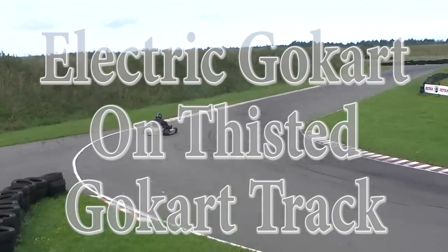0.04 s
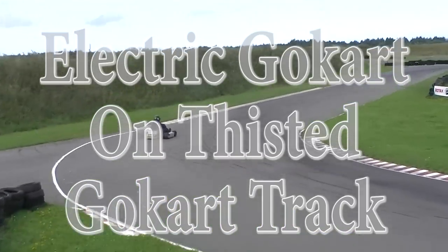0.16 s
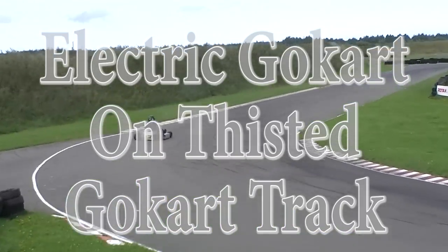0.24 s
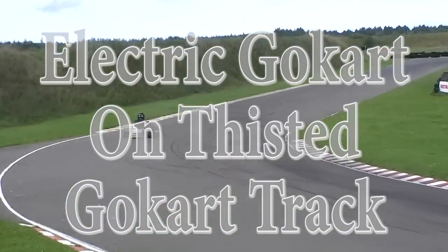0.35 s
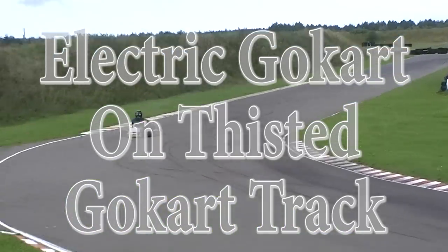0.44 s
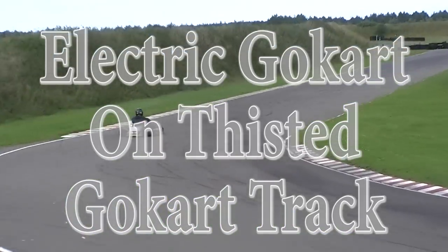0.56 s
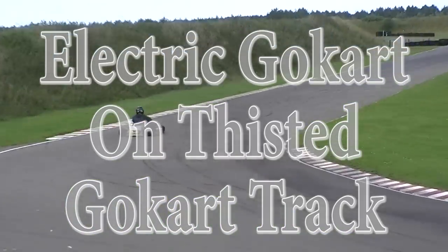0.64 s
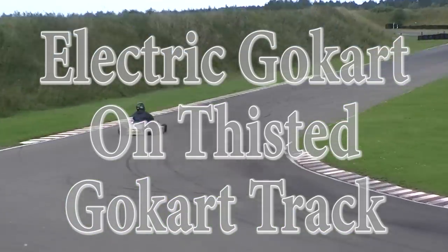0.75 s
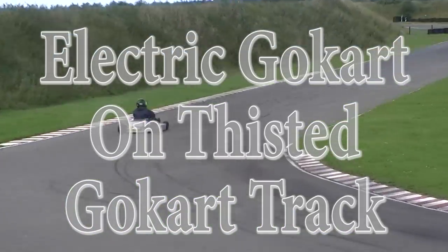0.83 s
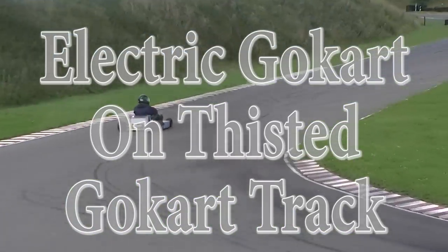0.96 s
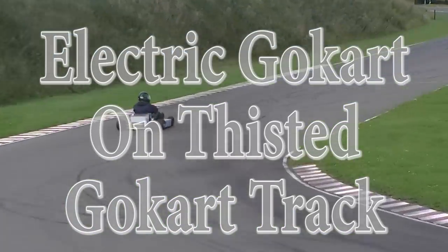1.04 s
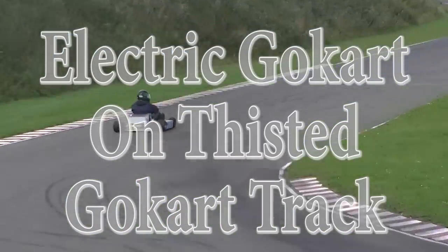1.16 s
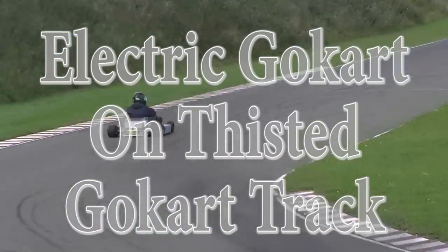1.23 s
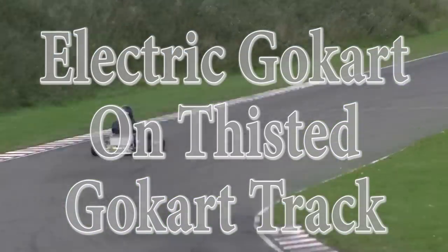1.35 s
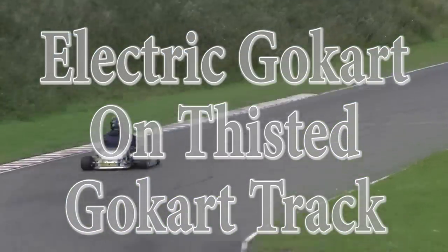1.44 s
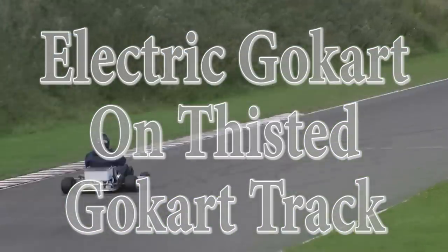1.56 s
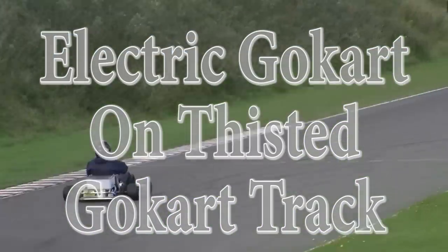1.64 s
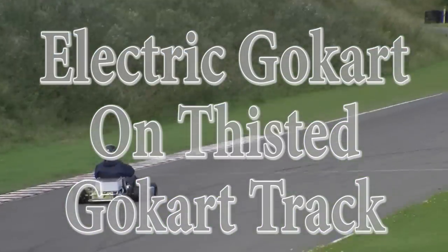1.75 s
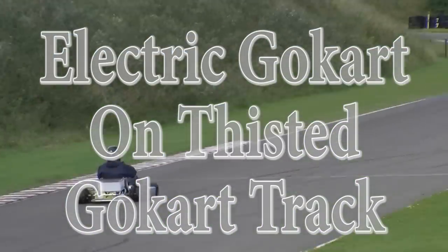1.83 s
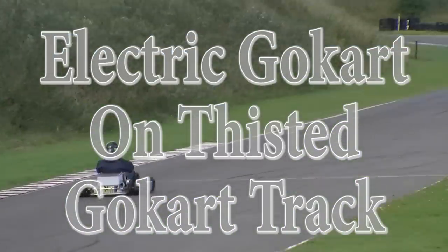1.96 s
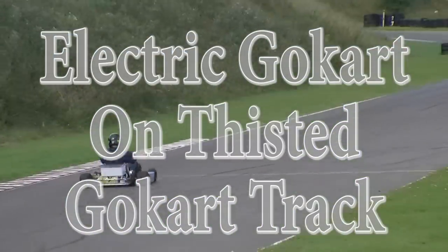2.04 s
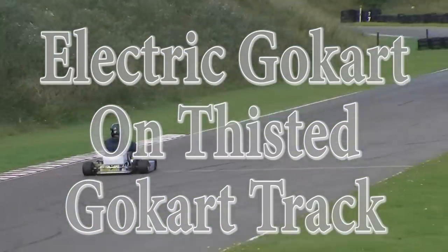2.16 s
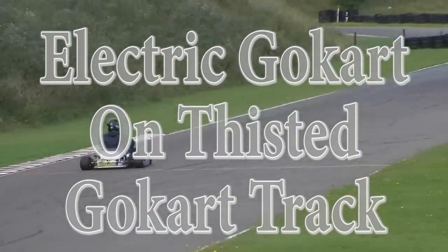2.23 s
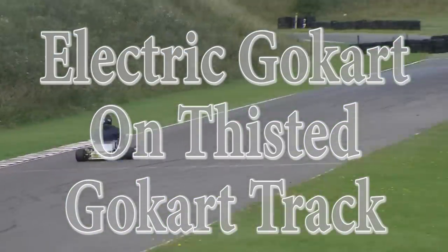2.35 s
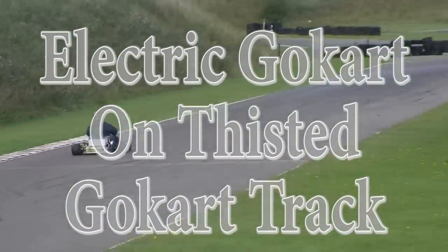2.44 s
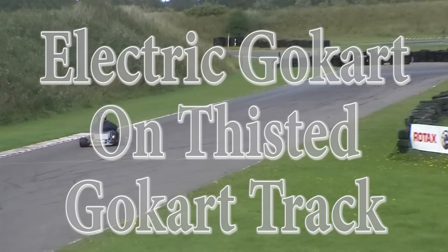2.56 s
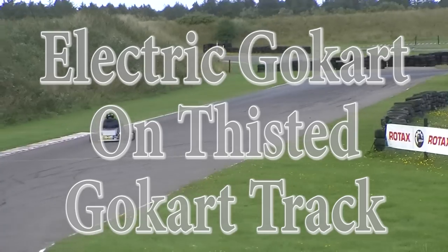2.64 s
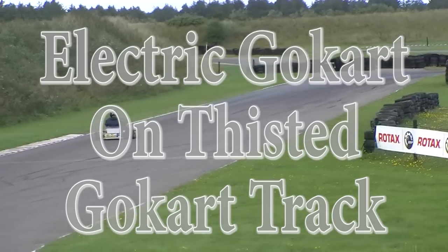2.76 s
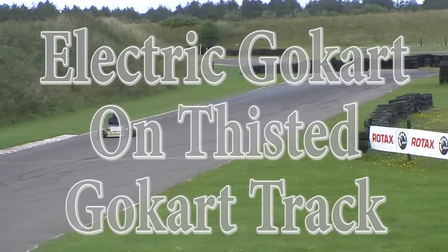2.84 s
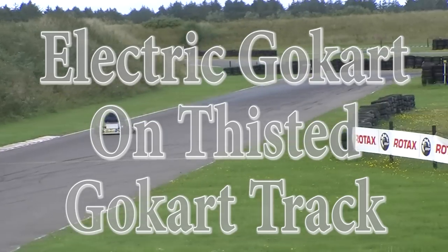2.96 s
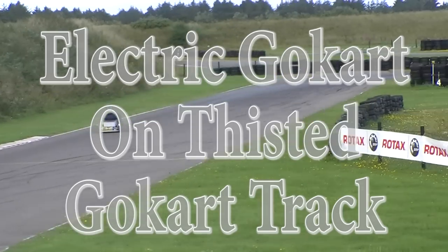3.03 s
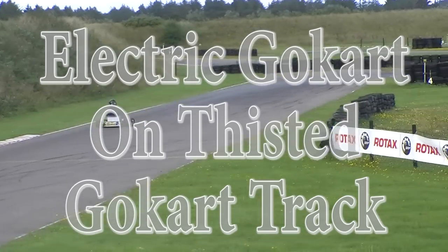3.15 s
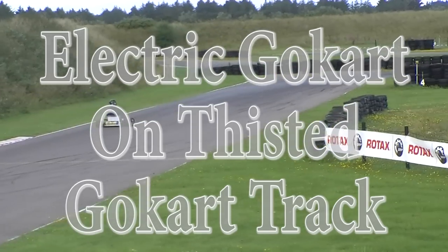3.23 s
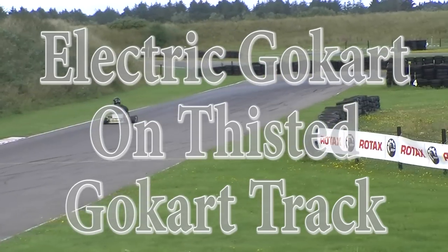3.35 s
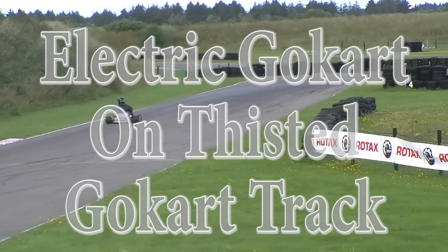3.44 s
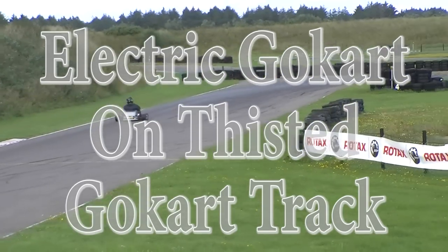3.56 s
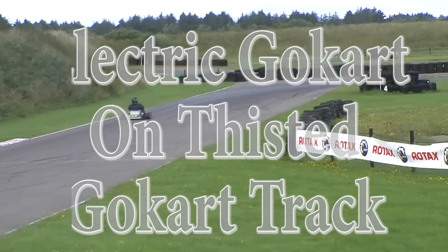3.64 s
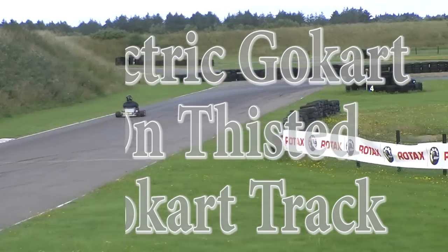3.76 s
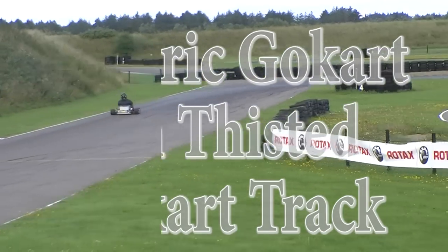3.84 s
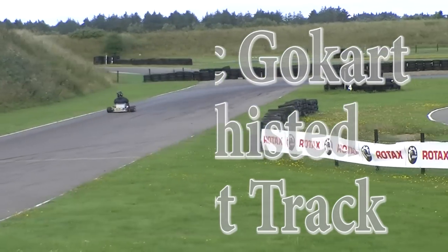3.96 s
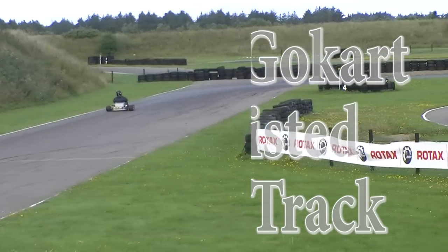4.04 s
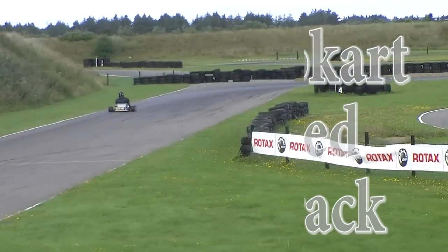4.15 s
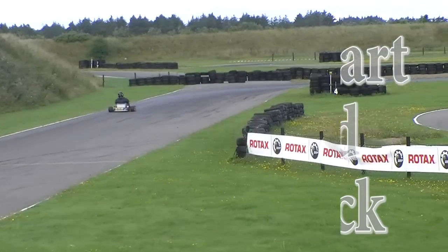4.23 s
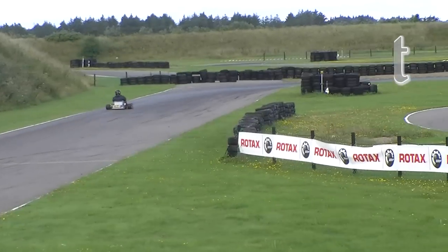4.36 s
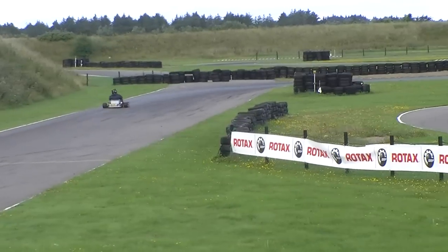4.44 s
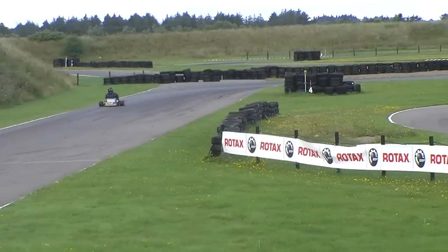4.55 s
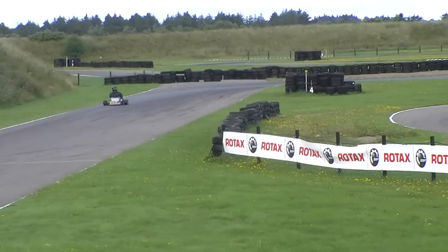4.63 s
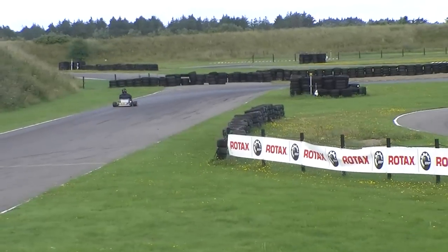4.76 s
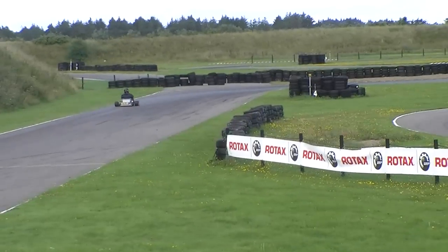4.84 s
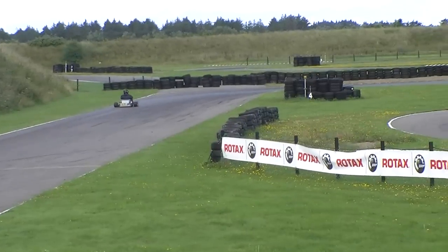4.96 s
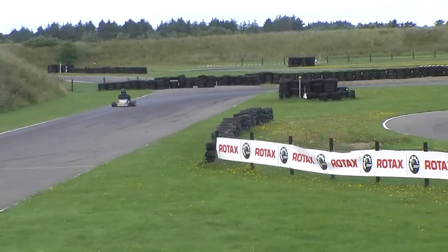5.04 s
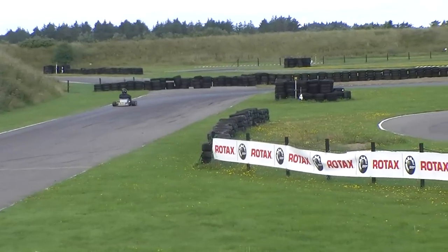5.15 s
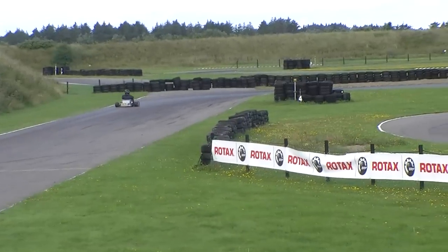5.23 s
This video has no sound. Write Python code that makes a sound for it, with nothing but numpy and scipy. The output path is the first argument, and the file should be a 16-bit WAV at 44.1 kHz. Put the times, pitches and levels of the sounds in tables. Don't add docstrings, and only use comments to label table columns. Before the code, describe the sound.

Trackside in open air, from the grass, with a small stereo microphone. From 0 s an electric go-kart is already strong: a bright, dense, sizzling hiss of chain rollers, and a clear whine around 435 Hz that climbs without steps, reaching about 800 Hz by 2 s and just over 1 kHz by 3.7 s. The whine flutters and swells or dips as the frame resonates. A metallic guard rattle and mid-pitched tyre roar fill in; the chain surges in short bursts near 1.9, 2.6 and 3.4 s. Tyre roar is fullest around 2.5 s, while the hiss briefly dulls near 2.75 s. Light wind thumps the microphone, strongest about 1 and 1.4 s. Small stones click at 1.56 and, loudest, 3.6 s. At 3.7 s the whine cuts off and the hiss drops; rattle and scrubbing tyre noise recede, with faint pings at 4.1 s, another wind bump at 5.1 s and faint leaves until 5.3 s.

```python
import sys
import numpy as np
from scipy import signal
from scipy.fft import rfft, irfft, next_fast_len
from scipy.io import wavfile
from scipy.ndimage import uniform_filter1d

SR = 44100
rng = np.random.default_rng(int(sys.argv[2]) if len(sys.argv) > 2 else 0)


def invert_db(level):
    return 10 ** (np.asarray(level, dtype=float) / 20)


def log_audio(samples):
    frames = np.atleast_2d(samples).T
    limited = np.clip(frames, -1, 1)
    pcm = np.round(limited * 32767).astype(np.int16)
    wavfile.write(sys.argv[1], SR, pcm)


N = 233476
T = np.arange(N) / SR

# frequency in Hz, density in dB per Hz.
RUSTLE_SPECTRUM = [(120, -16.5), (300, -2.5), (700, -6), (1500, -14.5), (3000, -19.5), (6000, -23),
                   (9400, -19), (11000, -27), (13500, -38), (15000, -50)]
# frequency in Hz, density in dB per Hz.
WIND_SPECTRUM = [(10, -45.5), (30, -14), (60, 3.5), (120, -0.5), (200, -3.5), (300, -17), (500, -25),
                 (900, -49.5), (2500, -110)]
# centre in seconds, peak in dB, half length in seconds.
GUSTS = [(.07, -63, .04), (0.273, -49, 0.059), (.46, -56, .07), (0.617, -44, 0.032), (0.76, -50.5, 0.073),
         (0.97, -35.5, .06), (1.12, -42, 0.074), (1.256, -45.5, 0.041), (1.438, -31, 0.059),
         (1.553, -46, 0.074), (1.738, -40.5, 0.031), (1.917, -52, 0.057), (2.13, -62, .07),
         (2.307, -65, .04), (2.52, -58, .11), (3.01, -52, 0.025), (3.15, -59, 0.036), (3.39, -45, 0.074),
         (3.555, -53.5, 0.056), (3.78, -51, .04), (3.944, -56, 0.051), (4.62, -58.5, .04),
         (4.912, -50, 0.029), (5.12, -37, .07)]
# start in seconds, peak in dB, pitch in Hz, 60 dB decay time in seconds.
GRIT = [
    (1.56, -24, 1500, .006),
    (3.556, -27, 620, .03),
    (3.613, -13, 1400, .008),
    (4.115, -36, 580, .09),
    (4.132, -36, 680, .06),
    (5.273, -33, 1400, .015),
]

# time in seconds, level in dB.
ROAR_LEVEL = [(0, -35), (.1, -34.5), (1.2, -37.5), (1.8, -33.5), (2.3, -32.5), (2.55, -29.5), (2.95, -37),
              (3.27, -33), (3.7, -40.5), (4.0, -39.5), (4.4, -44.5), (4.85, -50), (5.29, -53.5)]
# frequency in Hz, density in dB per Hz.
ROAR_SPECTRUM = [(350, -90), (650, -53), (800, -21.5), (950, -3), (1070, -2.5), (1240, 4.5), (1450, -1.5),
                 (1620, 2), (1800, 0.5), (2000, -2.5), (2150, -7), (2400, -21), (3000, -36), (5000, -110)]
# frequency in Hz, density in dB per Hz.
SCRUB_SPECTRUM = [(1000, -94), (1800, -21), (2250, -5.5), (2450, 0.5), (2680, 3), (2900, -1.5),
                  (3200, -6.5), (3500, -6.5), (4200, -25), (7000, -110)]
# frequency in Hz, density in dB per Hz.
DRONE_SPECTRUM = [(40, -80), (100, -68), (150, -51), (230, -4), (300, -19.5), (400, -15.5), (470, -2.5),
                  (600, 3.5), (740, -3.5), (850, -1.5), (1100, -35), (2000, -110)]
# centre in seconds, scrub change in dB, half length in seconds.
SLIDES = [(.43, 7.5, 0.069), (1.25, 4.5, 0.16), (1.84, 3.5, 0.24), (2.72, 6, 0.18), (3.05, 5, .05),
          (3.6, 4, 0.44), (3.9, 4, 0.046), (4.35, 9, 0.22), (4.78, 5.5, 0.2), (4.95, -7.5, 0.12),
          (5.22, 7, 0.18)]

# time in seconds, level in dB.
TICK_LEVEL = [(0, -32.5), (.25, -30), (1.5, -28.5), (2.72, -28.5), (3.11, -36.5), (3.62, -41.5),
              (3.74, -54), (4.3, -52.5), (5.05, -68.5), (5.29, -61)]
# frequency in Hz, density in dB per Hz.
TICK_SPECTRUM = [(3120, -43.5), (5300, -8.5), (5460, -9), (5720, -9.5), (6740, -5.5), (7090, 0),
                 (7550, 2.5), (8390, 0), (9200, 1), (9680, 0.5), (11800, -18), (12900, -23.5),
                 (14500, -40.5)]
# frequency in Hz, density in dB per Hz.
GUARD_SPECTRUM = [(1820, -25.5), (3100, -2), (3320, -5), (3960, 0.5), (4290, 1), (4730, -1), (5100, -0.5),
                  (5380, -4.5), (5600, -3), (7280, -18.5), (12300, -120)]
# centre in seconds, change in dB,
# half length in seconds.
WHIPS = [(.158, 5, .096), (.335, 2.5, .032), (.669, 3.5, 0.19), (.824, -6, 0.085), (.939, -4, .128),
         (1.113, 5, 0.037), (1.27, 4, 0.072), (1.62, 0, 0.057), (1.867, 9.5, 0.09), (2.091, 4, 0.036),
         (2.249, -3.5, .04), (2.403, 6, 0.1), (2.616, 10, 0.093), (2.889, 1.5, 0.047), (3.379, 10, 0.12),
         (3.83, 4.5, 0.017), (4.03, -5.5, .117), (4.463, 6, .023)]
# centre in seconds, change in dB, half length in seconds.
RATTLES = [
    (.97, -3.5, 0.074),
    (1.74, 3.5, 0.091),
    (2.2, -4, 0.059),
    (3.2, -4.5, 0.07),
    (3.52, -6, 0.11),
    (3.72, 4, .06),
]
# centre in seconds, tilt in dB per octave, half length in seconds.
DULLED = [
    (2.76, -7.5, .12),
]

# time in seconds, teeth meshing per second.
TOOTH_RATE = [(0, 434.8), (.6, 552.8), (1.2, 669.7), (1.7, 758.6), (2.0, 808.6), (2.3, 856.2), (2.6, 906.2),
              (2.9, 942.4), (3.2, 973.2), (3.5, 998.5), (3.95, 1027.5)]
# multiple of the tooth rate, level in dB, drift in dB per second,
# gain in dB while the kart is side-on.
SPROCKET_LINES = [
    (1, -29, -3.6, 1),
    (2, -44, .4, 3.5),
    (.5, -48.5, -2.4, 4),
    (1.5, -57, .5, 6),
    (3, -53, -1.8, 0),
    (4, -59, -.5, 3),
    (5, -64, .6, 5),
    (6, -65, 0, 3),
]
# frequency in Hz, width in Hz, gain in dB.
FRAME = [(310, 75, -13), (438, 10, -5), (560, 23, 6.5), (612, 21, 9.5), (674, 10, -10), (748, 30, -4),
         (822, 25, -10), (1011, 12, 3.5), (944, 25, -27), (1050, 30, -18), (1238, 40, 7), (1350, 36, -28),
         (2034, 41, -20), (4560, 150, 19)]

# frequency in Hz, width in Hz, gain in dB.
HOUSING = [(3750, 27, 0), (5120, 14, 3.5), (5360, 154, -7.5), (6520, 45, -1.5), (6484, 330, 5.5),
           (4690, 14, 8.5)]
# frequency in Hz, left minus right in dB.
LEAN = [(60, -1.5), (95, -1.5), (150, -1.5), (240, -1.5), (370, -2.0), (590, -1.5), (930, -1.0),
        (1470, 0.0), (2310, 0.0), (3650, -2.0), (5770, -2.0), (9100, -2.0), (14400, 0.0)]
# frequency in Hz, lead of the left in radians.
LEAD = [(300, 0), (3100, -.1), (5430, .2), (6030, 0), (9650, .55), (11700, .1), (14600, 0)]
# frequency in Hz, level in dB.
SCATTER = [(300, -16), (700, -24), (1100, -25), (2600, -23), (4000, -20), (6000, -26), (9000, -16),
           (11000, -17), (14000, -17)]


def evened(x):
    return x / np.sqrt(np.mean(x ** 2) + 1e-20)


def read(points, hz):
    f, value = np.transpose(points)
    return np.interp(np.log(hz + 1), np.log(f + 1), value)


def curve(rows):
    s, value = np.transpose(rows)
    return np.interp(T, s, value)


def swells(rows, at=T):
    return sum(high * np.exp(-((at - mid) / max(half, .01)) ** 2) for mid, high, half in rows)


def drift(per_s):
    span = max(int(SR / per_s), 1)
    once = uniform_filter1d(rng.standard_normal(N), span)
    return evened(uniform_filter1d(once, span))


def coloured(x, spectrum, patchy_db, tilt_db=0., pivot_hz=8500):
    hz, t, z = signal.stft(x, SR, nperseg=1024, noverlap=768)
    over_hz = uniform_filter1d(rng.standard_normal(z.shape), 4, 0)
    patches = evened(uniform_filter1d(over_hz, 14, 1))
    octaves = np.clip(np.log2((hz + 1) / pivot_hz), -.5, 1)
    tilt = np.outer(octaves, np.interp(t, T, tilt_db * np.ones(N)))
    z = z * invert_db(read(spectrum, hz)[:, None] + patchy_db * patches + tilt)
    return evened(signal.istft(z, SR, nperseg=1024, noverlap=768)[1][:N])


def grains(per_s, spread_db):
    sign = rng.choice([-1., 1.], N)
    size = invert_db(spread_db * np.minimum(rng.exponential(1, N), 4)) * sign
    return evened(size * (rng.random(N) < per_s / SR))


def rustle():
    return invert_db(-51.5) * np.array([coloured(rng.standard_normal(N), RUSTLE_SPECTRUM, 1.7) for _ in range(2)])


def wind():
    calm_db = -73
    gusts = swells([(s, invert_db(db), half) for s, db, half in GUSTS])
    lumps = (invert_db(calm_db) + gusts) * invert_db(1.0 * drift(25))
    same, opposed = (coloured(rng.standard_normal(N), WIND_SPECTRUM, 1.9) for _ in range(2))
    same, opposed = (x / np.sqrt(uniform_filter1d(x ** 2, 3000) + .15) for x in (same, opposed))
    pressure = invert_db(-12.5) * same + opposed * np.array([[1], [-1]])
    return invert_db([[-.6], [.6]]) * lumps * pressure


def grit():
    out, t = np.zeros(N), np.arange(4000) / SR
    onset = np.minimum(t / 0.0024, 1)
    for s, db, hz, t60 in GRIT:
        ping = invert_db(db - 60 * t / max(t60, .004)) * np.sin(2 * np.pi * hz * t) * onset
        part = out[round(s * SR):][:len(t)]
        part += ping[:len(part)]
    return out


def tyres(patchy_db=2.2):
    scrub_db = -8 - 8.5 * np.exp(-T / 0.49) + swells(SLIDES)
    drone_db, hold_s, fall_db_per_s, far_db = -38, 1.93, 6.5, -56
    drone_db = np.maximum(drone_db - fall_db_per_s * np.maximum(T - hold_s, 0), far_db)
    road = invert_db(0.11 * drift(21)) * (rng.standard_normal(N) + 0.24 * grains(3000, 1.5))
    roar = coloured(road, ROAR_SPECTRUM, patchy_db)
    scrub = invert_db(scrub_db) * coloured(road, SCRUB_SPECTRUM, patchy_db)
    drone = invert_db(drone_db) * coloured(road, DRONE_SPECTRUM, patchy_db)
    return invert_db(curve(ROAR_LEVEL)) * (roar + scrub) + drone


def roller_ticks(turns, run_db, whip_db, patchy_db=2.2):
    bright_db = 4 * (1 - np.exp(-T / 0.14)) + 0.75 * np.minimum(run_db - run_db[0], 0)
    crisp_per_db = swells([(2, 0.73, 0.9)])
    bright_db = bright_db + whip_db * crisp_per_db + swells(DULLED)
    depth = np.interp(T, [0, 1.5, 2.2, 3], [0.15, .45, 0.22, 0.13])
    beat = 1 - depth + 2.5 * depth * np.exp(-(turns % 1) / 0.58)
    shake = invert_db(0.79 * drift(45) + 0.83 * drift(200))
    rollers = beat * shake * (rng.standard_normal(N) + 0.2 * grains(5100, 5.2))
    return invert_db(run_db + whip_db) * coloured(rollers, TICK_SPECTRUM, patchy_db, bright_db)


def guard_rattle(run_db, whip_db, patchy_db=2.2):
    near_db = curve(ROAR_LEVEL)
    guard_db = -37.5 + 0.65 * (run_db - run_db.max()) + 0.17 * (near_db - near_db[0])
    guard_db = guard_db + 0.44 * whip_db + 0.88 * T + swells(RATTLES)
    guard = invert_db(guard_db) * coloured(rng.standard_normal(N), GUARD_SPECTRUM, patchy_db)
    ring_hz, ring_width_hz, ring_db, until_s, fade_s = 5050, 130, 1.5, 1.45, .5
    ring = signal.lfilter(*signal.iirpeak(ring_hz, ring_hz / ring_width_hz, SR), guard)
    facing = np.clip(1 - (T - until_s) / fade_s, 0, 1)
    return guard + invert_db(ring_db) * facing * ring


def chain(turns):
    run_db, whip_db = curve(TICK_LEVEL), swells(WHIPS)
    return roller_ticks(turns, run_db, whip_db) + guard_rattle(run_db, whip_db)


def whine(turns):
    out, rate = np.zeros(N), curve(TOOTH_RATE)
    side_on_s, side_on_length_s, lift_off_s, lift_fade_s = 2.05, .6, 3.72, .03
    resonances = [(hz, db, width) for hz, width, db in FRAME]
    for order, db, drift_db, side_db in SPROCKET_LINES:
        frame_db = swells(resonances, order * rate)
        facing_db = swells([(side_on_s, side_db, side_on_length_s)])
        level_db = db + drift_db * T + facing_db + frame_db
        wobble = .12 * np.sqrt(order) * drift(40)
        flutter_db = 1.4 * drift(45) if order == 1 else 1 + 1.8 * drift(18)
        line = np.sqrt(2) * np.cos(2 * np.pi * order * turns + wobble)
        out += invert_db(level_db + flutter_db) * line
    return out * np.clip((lift_off_s - T) / lift_fade_s, 0, 1)


def ports(x):
    size = next_fast_len(N + 2000)
    hz = np.fft.rfftfreq(size, 1 / SR)
    housing_db = sum(db * np.exp(-((hz - f) / width) ** 2) for f, width, db in HOUSING)
    z = rfft(x, size) * invert_db(housing_db)
    lean = invert_db(read(LEAN, hz) / 2) * np.exp(.5j * read(LEAD, hz))
    taps = rng.standard_normal(4000) * invert_db(-30 * np.arange(4000) / 4000)
    scatter = rfft(taps / np.linalg.norm(taps), size) * invert_db(read(SCATTER, hz))
    return irfft(z * np.array([lean + scatter, 1 / lean - scatter]), size)[:, :N]


def scene():
    turns = np.cumsum(curve(TOOTH_RATE)) / SR
    kart = grit() + tyres() + chain(turns) + whine(turns)
    return rustle() + wind() + ports(kart)


def without_masked_bands(x, width=20):
    middle_side = np.array([x[0] + x[1], x[0] - x[1]]) / 2
    hz, t, z = signal.stft(middle_side, SR, nperseg=2048)
    band = np.arange(len(hz)) // width
    power = np.add.reduceat(abs(z) ** 2, np.arange(0, len(hz), width), axis=1)
    band_db = 10 * np.log10(power + 1e-20)[:, band]
    whole_db = 10 * np.log10((abs(z[0]) ** 2).sum(0) + 1e-20)
    faint = (hz[:, None] > 12800) & (band_db < whole_db - 46)
    faint[1] |= (hz[:, None] > 1050) & (band_db[1] < band_db[0] - 19.5)
    mid, side = signal.istft(z * ~faint, SR, nperseg=2048)[1][:, :N]
    return np.array([mid + side, mid - side])


def roll_off(x):
    return signal.sosfilt(signal.butter(12, 14970, fs=SR, output="sos"), x)


def record(dry):
    mix = without_masked_bands(dry)
    return roll_off(mix)


dry = scene()
out = record(dry)
log_audio(out)
```